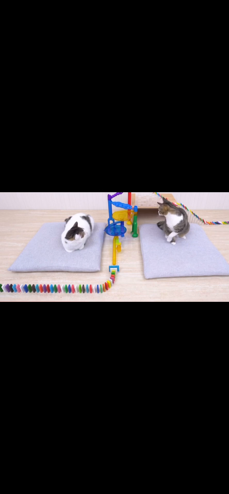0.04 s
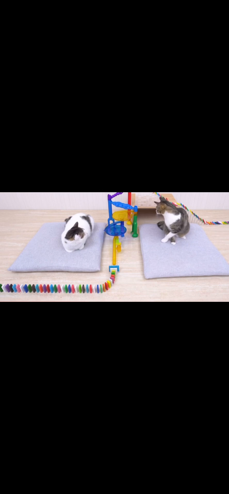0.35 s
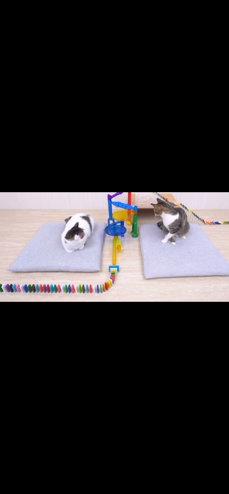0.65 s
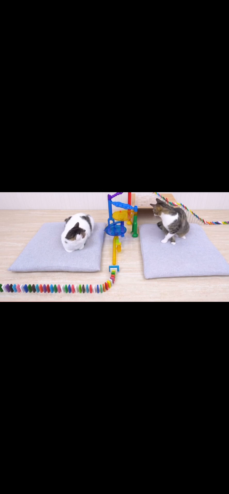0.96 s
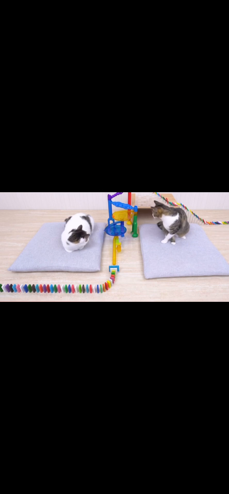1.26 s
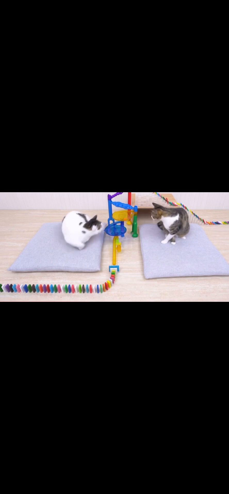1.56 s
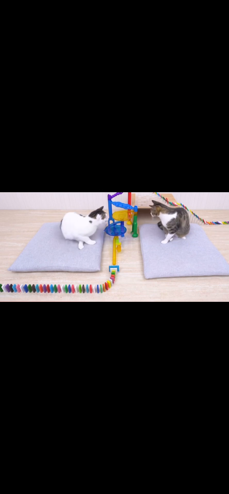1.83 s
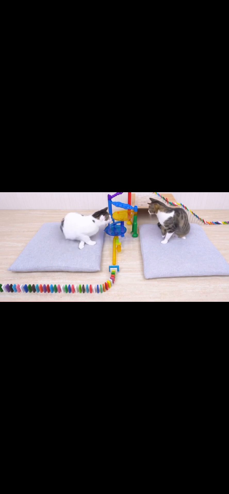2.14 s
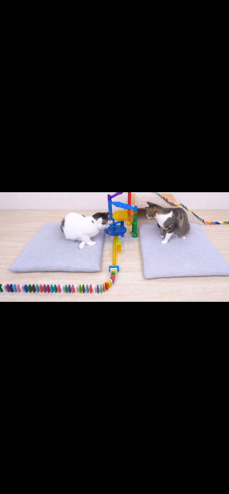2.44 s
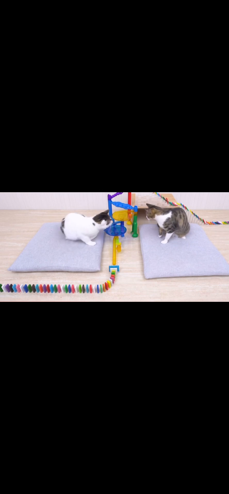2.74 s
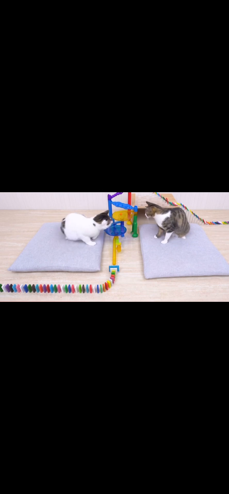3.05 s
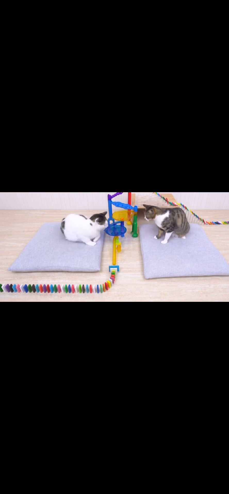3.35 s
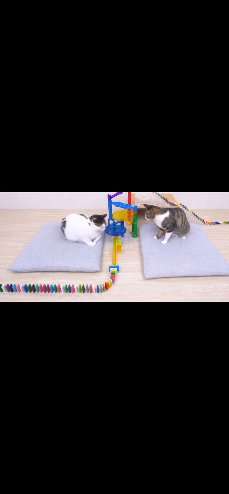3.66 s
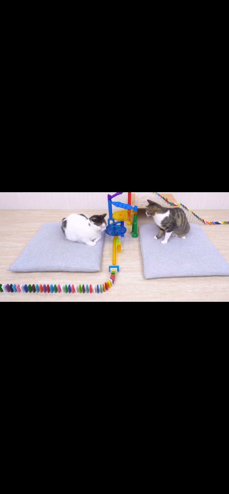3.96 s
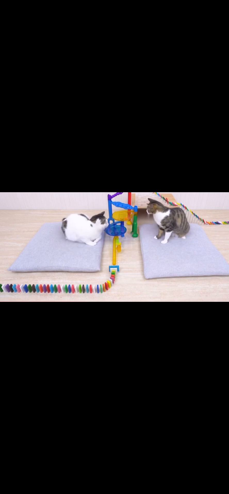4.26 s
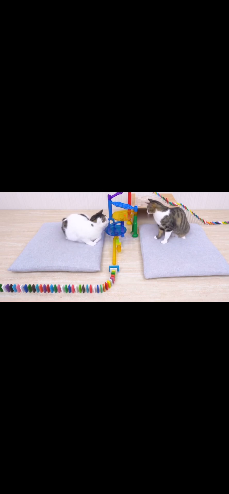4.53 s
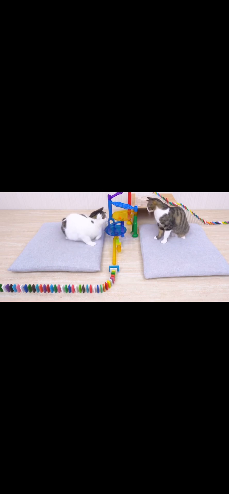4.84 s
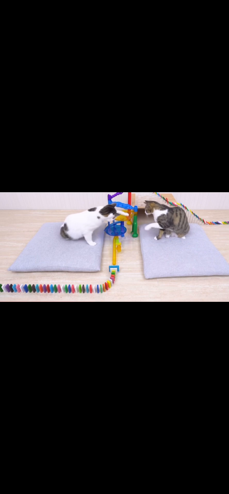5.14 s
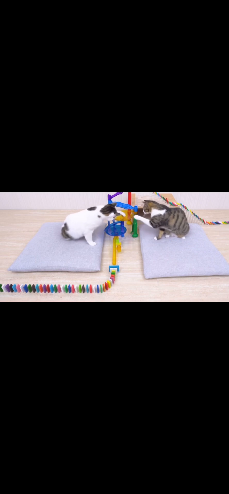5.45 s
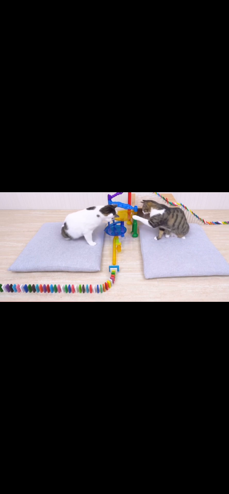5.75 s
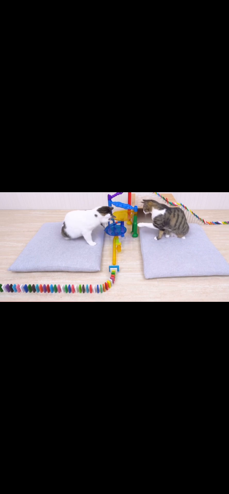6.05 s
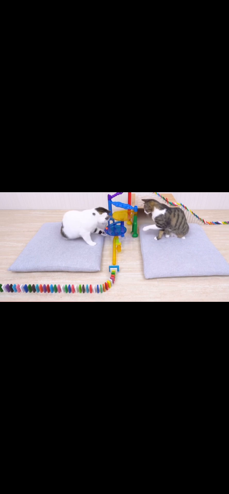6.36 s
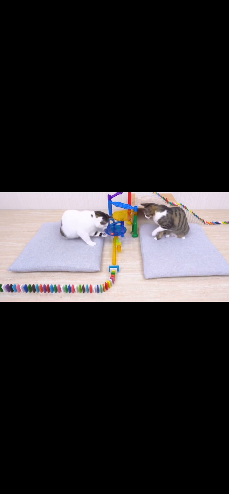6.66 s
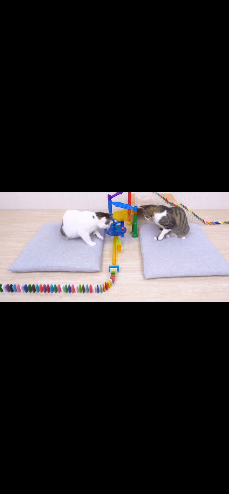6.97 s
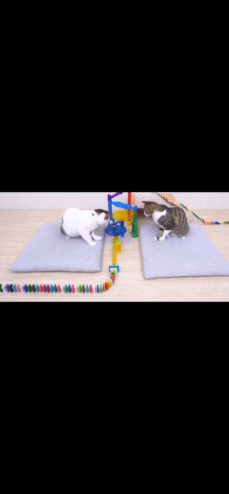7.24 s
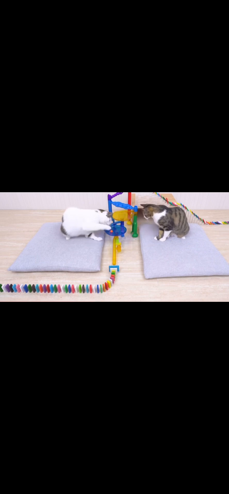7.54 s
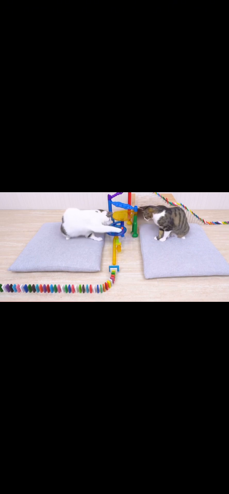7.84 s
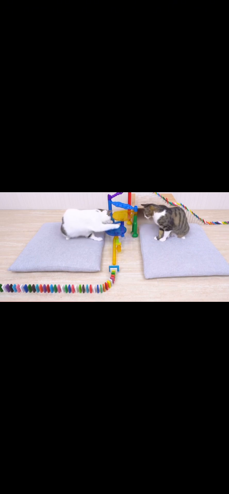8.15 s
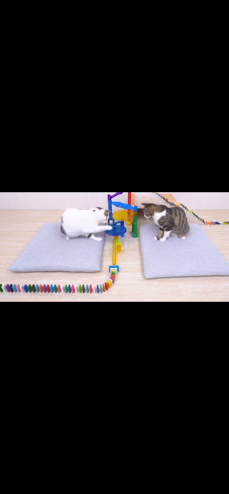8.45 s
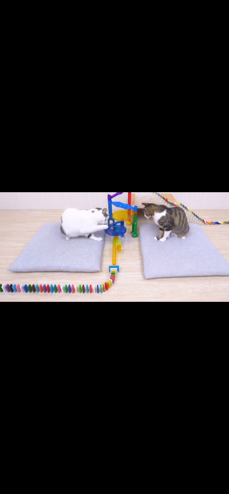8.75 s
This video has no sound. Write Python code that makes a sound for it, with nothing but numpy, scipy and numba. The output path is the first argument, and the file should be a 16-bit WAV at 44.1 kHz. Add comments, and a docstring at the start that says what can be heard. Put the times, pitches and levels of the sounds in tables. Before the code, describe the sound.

A marble clacks into a plastic toy run, rolls around the bends, clatters into a hollow piece and rolls on.

```python
"""Marble in a plastic toy run

A marble clacks and bounces into a plastic run in a small, hard-floored room. It knocks at the joints,
circles the bends about once a second, scrapes the walls and clatters into a hollow piece, then rolls on.
Rolling is a stream of tiny impacts; the marble's place in the lap decides which modes they ring.
Harder blows are brighter, and each spot that is struck favours its own modes."""
import sys
import numpy as np
from scipy import signal
from scipy.fft import rfft, irfft
from scipy.io import wavfile
from scipy.ndimage import uniform_filter1d, map_coordinates
from numba import njit

SR = 44100
rng = np.random.default_rng(int(sys.argv[2]) if len(sys.argv) > 2 else 0)


def output_pcm(signal):
    """Save a mono or channel-first signal as 16-bit PCM at the path in sys.argv[1].

    Samples are clipped to [-1, 1] before scaling.
    """
    pcm = np.clip(np.atleast_2d(signal).T, -1, 1) * 32767
    wavfile.write(sys.argv[1], SR, np.round(pcm).astype(np.int16))


N = 396900

# reverb tail of the room: (frequency [Hz], t60 [s], level [dB])
ROOM_TAIL = [(249.3, 0.85, 2.5), (890, 0.58, 1.5), (2000, 0.46, 0), (2670, 0.48, -3), (3210, 0.56, -0.5),
             (4100, 0.46, 1.5), (4900, 0.51, -4.5), (6095, 0.42, -7.5), (8000, 0.44, -3),
             (14960, .28, -6.5)]
# the frame of the run, singing along with the marble: (frequency [Hz], width [Hz], level [dB])
FRAME_RING = [(899, 15, 5.5), (1040, 4.8, -2), (1268, 18, 1.5), (1377, 14, -0.5), (1483, 10, -7),
              (1510, 12, -3.5), (1761, 37, -3), (2480, 10, -4), (2740, 7.4, -8)]
# colour of the background noise, low room rumble plus a faint high hiss: (frequency [Hz], gain [dB])
BACKGROUND_EQ = [(18, -35.5), (36, -4.5), (52, -3), (100, 1.5), (128, -2), (303, -4.5), (362, -2),
                 (443, 3.5), (543, -4.5), (756, 0.5), (1110, -19), (1790, -14), (3470, -29),
                 (4950, -22.5), (8440, -24), (9580, -22), (13000, -22.5)]
# body, thud, ring and tick bands of a blow: (low edge [Hz], high edge [Hz])
BLOW_BANDS = [(1150, 2300), (300, 1150), (2300, 5000), (5000, 16000)]
# colour of the contact crack: (frequency [Hz], gain [dB])
CRACK_EQ = [(200, -22.5), (450, -14), (720, -15), (950, -2), (2000, 1), (6000, -2.5), (15000, -8.5)]

# clacks on a small piece: (time [s], body level [dB], hardness [dB], spot pitch [Hz])
CLACK_HITS = [(-0.025, -32.5, -1.5, 2577), (0.0544, -47, 3.5, 2600), (0.1252, -34, -2.5, 2610),
              (0.148, -37, -5, 2600), (0.1754, -42.5, -4.5, 2016)]
# modes of the small piece: (frequency [Hz], width [Hz], level [dB])
SMALL_PIECE_MODES = [(900, 10, -8), (1130, 23, -12), (1430, 21, -11.5), (2034, 40, -4.5), (2620, 170, 3),
                     (3450, 60, -15.5), (4260, 130, -9), (5530, 240, -3), (5730, 150, -16.5),
                     (6670, 340, -7.5), (7970, 400, -12)]
# bright bounces on a hard part: (time [s], body level [dB], hardness [dB], spot pitch [Hz])
BOUNCE_HITS = [(0.2931, -32.5, 2, 3370), (0.298, -32.5, -12.5, 3430), (0.3112, -34.5, 8.5, 6900),
               (0.33, -34.5, -13, 4200), (0.3399, -37, -10, 3200), (0.3468, -33.5, 7, 5970),
               (0.3664, -36.5, -13.5, 1750), (0.3859, -34.5, 4, 6130), (0.401, -39.5, -12, 4200),
               (0.4363, -38.5, 1.5, 5800), (0.4773, -41.5, -2, 5800), (0.5023, -43, -0.5, 5800),
               (0.5269, -46.5, -4.5, 2750), (0.5463, -46.5, -5.5, 2750), (0.562, -47.5, -8.5, 2750)]
# modes of the hard part: (frequency [Hz], width [Hz], level [dB])
HARD_PART_MODES = [(1101, 43, -10), (1682, 78, 4), (2760, 190, 1), (3180, 98, -11), (3413, 41, -5),
                   (4290, 370, -5.5), (5780, 170, 0.5), (6760, 170, -1.5), (7670, 150, -9), (9570, 500, -8),
                   (11100, 1100, 4), (14300, 1300, -3)]
# knocks on walls and joints: (time [s], body level [dB], hardness [dB], spot pitch [Hz])
KNOCK_HITS = [(0.7459, -54.5, -3.5, 2800), (0.7955, -53, -7, 1250), (0.8366, -47.5, -7, 1260),
              (0.8587, -38.5, -1.5, 1780), (0.9512, -43.5, 2.5, 970), (0.9752, -40.5, -8, 1400),
              (1.064, -44, 7, 1330), (1.6602, -39, 2, 1780), (1.77, -30, 8.5, 1470),
              (1.7832, -34.5, -2, 910), (1.8819, -44, 8, 920), (1.9281, -42.5, 4, 1780),
              (1.991, -40.5, -7, 900), (2.1001, -42, -4, 940), (2.1957, -44.5, -1.5, 1250),
              (2.5279, -42, -1, 1440), (2.7988, -29.5, -4.5, 1460), (2.8227, -31.5, 6, 894),
              (3.0366, -38.5, 6.5, 1390), (3.1691, -42.5, -3, 940), (3.4238, -46, -2, 1500),
              (3.5229, -37.5, 1.5, 1830), (3.6063, -41.5, 4, 2710), (3.618, -41.5, 3.5, 2710),
              (3.9477, -39, 1, 2070), (4.599, -43, 3, 1640), (4.8988, -48, -6.5, 1400),
              (5.0853, -45.5, -10.5, 1520), (6.1526, -44.5, -4.5, 1434), (6.4979, -43.5, -3, 1310),
              (6.6602, -46, -7, 1520), (6.9174, -40.5, 4.5, 1630), (6.9405, -42, -5.5, 1700),
              (6.9477, -38.5, 6, 1760), (6.9595, -41, -1, 1700), (7.0264, -39, 2, 1410),
              (7.0772, -25.5, 8.5, 1450), (7.0925, -37, -4.5, 1400), (7.101, -36, 6, 1410),
              (7.2437, -33.5, -1, 1800), (7.3742, -38, -2, 1520), (7.5437, -43, -11.5, 1870),
              (7.7122, -42.5, -4, 1500), (7.7885, -41, -5.5, 1500), (7.8235, -43, -8, 1550),
              (7.837, -45, -4, 1830), (7.8905, -43, -3.5, 1610), (8.0067, -28, 4, 1690),
              (8.0254, -32.5, -2.5, 1670), (8.0608, -19, 5.5, 1710), (8.5072, -35.5, -11, 1810),
              (8.5124, -34.5, 5, 1420), (8.7537, -34, 4, 1835), (8.8405, -45, -2, 1700),
              (8.8643, -47, -1, 1750), (8.878, -37.5, -3, 1750), (8.9469, -46, 12, 1820),
              (8.9824, -41.5, 6, 1400)]
# walls and joints above the drop: (frequency [Hz], width [Hz], level [dB])
UPPER_WALL_MODES = [(926, 7.8, -14.5), (1048, 25, -18.5), (1250, 150, 2), (1510, 18, 7), (1710, 110, 10),
                    (2190, 260, 4), (2715, 100, 6.5), (3270, 220, 9.5), (4030, 115, 0), (5560, 100, -10),
                    (6400, 150, -3), (7360, 190, -14), (10400, 200, -31)]
# walls and joints below the drop: (frequency [Hz], width [Hz], level [dB])
LOWER_WALL_MODES = [(598, 63, -5), (830, 82, -1.5), (1042, 23, 1.5), (1183, 140, 4.5), (1416, 6.6, 4),
                    (1566, 17, 3.5), (1675, 130, 4.5), (1782, 63, 6.5), (2130, 24, -4), (2630, 60, -9),
                    (3010, 70, -5.5), (3417, 110, -6.5), (3920, 120, -9.5), (4280, 140, -6),
                    (6150, 400, -19), (13200, 400, -4)]

# slow course of the roll, a list per stretch: (time [s], body fader [dB], grit fader [dB], resonance [Hz])
ROLL_STRETCHES = [
    [(0.8, -62, -65, 1330), (0.97, -43, -48.5, 1350), (1.3, -47.5, -62.5, 1420), (1.85, -44, -56, 1336),
     (2.15, -53.5, -55.5, 1180), (2.32, -55, -64, 1470), (2.52, -42.5, -57, 1560), (2.66, -43.5, -57, 1370),
     (3.0, -53, -64, 1580), (3.2, -49.5, -57.5, 1500), (3.31, -47, -59.5, 1590), (3.42, -45, -61, 1520),
     (3.56, -44, -50.5, 1530), (3.9, -52.5, -63.5, 1543), (4.12, -48.5, -56, 1460), (4.4, -46, -61, 1616),
     (4.8, -52, -61.5, 1420), (5.12, -47, -76, 1600), (5.2, -52, -61.5, 1475), (5.27, -67, -82, 1533),
     (5.36, -70.5, -75, 1567)],
    [(6.05, -58, -75, 1380), (6.25, -49, -63.5, 1470), (6.58, -49, -62.5, 1440), (6.73, -54, -62.5, 1550),
     (6.96, -41.5, -48, 1480), (7.22, -47.5, -59.5, 1490), (7.48, -56.5, -68, 1580),
     (7.72, -50.5, -60.5, 1460), (7.84, -43.5, -60, 1464), (8.27, -52, -59, 1390), (8.36, -76, -73.5, 1365)],
    [(8.77, -50, -58, 1470), (8.92, -45.5, -53, 1294), (9.0, -36.5, -46, 1380)],
]
# the marble passes the stiffest spot of its lap: (time [s])
LAP_TIMES = [.72, 1.65, 2.64, 3.56, 4.4, 5.22, 6.05, 6.92, 7.87, 8.87, 9.85]
# what each lap adds to the slow course: (position [laps], body [dB], grit [dB], resonance [Hz])
LAP_SWING = [(0, -0.5, 3, 204), (0.201, -0.7, -1, -19), (.48, 1.9, 2, -4), (.7, 0.7, 2.5, -110),
             (.86, -0.4, 1.5, -29)]
# colour of the track under the rolling marble: (frequency [Hz], gain [dB])
RUMBLE_EQ = [(150, -46.5), (420, -9), (740, -3), (1000, -1), (1500, -14.5), (2200, -21), (3800, -5),
             (4800, -44), (6000, -22), (8000, -34), (13000, -45.5)]
# modes of the track: (frequency [Hz], width [Hz], level [dB], track resonance that drives it best [Hz])
TRACK_MODES = [(446.6, 16, -8, 1570), (919.6, 8.9, 18.5, 1226), (1011, 160, 2.5, 1382),
               (1192, 140, -5, 1464), (1368, 86, -0.5, 1470), (1580, 150, 5, 1670), (1772, 270, 7, 1750),
               (2062, 300, 5.5, 1204), (2300, 130, -13, 1630), (2740, 25, -7.5, 1710), (3425, 76, 0, 1344),
               (4170, 74, -7.5, 1650), (5350, 45, -14.5, 1600)]
# the plastic bowl that the hops tap: (frequency [Hz], width [Hz], level [dB])
BOWL_MODES = [(1035, 43, 3), (1250, 79, -5.5), (1410, 51, -3.5), (1479, 25, -2), (1657, 37, -3.5),
              (1772, 43, 4.5), (1885, 40, 11), (2000, 55, -13)]
# high track resonances that the grit rattles in: (frequency [Hz], width [Hz], level [dB])
GRIT_RING = [(2154, 68, -1.5), (2407, 79, -1), (2728, 120, 2), (3170, 54, 1.5), (3495, 75, -1.5),
             (4105, 120, 0.5), (5320, 160, -1), (6880, 200, -1.5)]

# short scrapes along the wall: (time [s], length [s], level [dB], spot pitch [Hz])
WALL_SCRAPES = [(2.368, 0.027, -65.5, 3280), (2.47, 0.031, -73, 3370), (2.523, 0.15, -60, 3900),
                (3.158, 0.053, -62.5, 2650), (3.387, 0.13, -62.5, 3970), (3.513, 0.1, -53.5, 2710),
                (4.369, 0.18, -61, 2720), (4.91, 0.085, -71.5, 3700), (5.016, 0.06, -65.5, 2750),
                (5.023, 0.064, -71, 4100), (6.298, 0.048, -71, 3560), (6.459, .13, -67, 4070),
                (6.898, .075, -57.5, 3000), (7.741, 0.022, -66, 3640)]
# modes that a scrape rings: (frequency [Hz], width [Hz], level [dB])
SCRAPE_RING = [(2210, 74, 12.5), (2736, 61, 6.5), (2970, 70, 4), (3080, 55, -1.5), (3530, 220, 0),
               (4100, 200, -1.5), (5350, 200, -3.5)]
# the drop and its bounces: (time [s], body level [dB], hardness [dB], spot pitch [Hz])
DROP_HITS = [(5.5915, -41.5, -19.5, 870), (5.6309, -36, -5.5, 2680), (5.6423, -26.5, 4, 1940),
             (5.652, -34.5, 10, 2200), (5.66, -29.5, 7.5, 2140), (5.6725, -39, -2.5, 4100),
             (5.678, -22.5, 1.5, 870), (5.7302, -39.5, -5, 1700), (5.7679, -25.5, -2.5, 900),
             (5.8367, -26.5, 1.5, 865), (5.8929, -33, 9, 1420), (5.8986, -28.5, -1, 1420),
             (5.9412, -37, -9.5, 1420), (5.956, -36.5, -3, 1700), (5.9755, -39, -7.5, 1700)]
# modes of the hollow piece it lands in: (frequency [Hz], width [Hz], level [dB])
HOLLOW_PIECE_MODES = [(250, 120, -21.5), (500, 160, -12.5), (865, 55, -1), (1405, 40, 4), (1700, 88, 7.5),
                      (2180, 110, -7), (2695, 100, -11), (3377, 86, -7.5), (3680, 110, -4.5),
                      (4150, 170, -2.5), (4970, 180, -7), (5700, 440, -3), (7200, 277, -15.5),
                      (9080, 130, -19)]


def undb(db):
    """Decibels to gain."""
    return 10 ** (np.asarray(db) / 20)


def unit(x):
    """Scale to rms 1."""
    return x / np.sqrt(np.mean(x ** 2) + 1e-20)


def band(x, lo_hz, hi_hz, order=3):
    """Causal band-pass."""
    sos = signal.butter(order, [lo_hz, min(hi_hz, .47 * SR)], "band", fs=SR, output="sos")
    return signal.sosfilt(sos, x + 1e-18)


def equalise(x, curve):
    """Minimum-phase EQ, built from the cepstrum of the curve's log gain."""
    hz, db = np.transpose(curve)
    bins_hz = np.maximum(np.fft.rfftfreq(4096, 1 / SR), 1)
    cepstrum = irfft(np.log(undb(np.interp(np.log(bins_hz), np.log(hz), db))))
    half = len(cepstrum) // 2
    cepstrum[1:half] *= 2
    cepstrum[half + 1:] = 0
    return signal.fftconvolve(x, irfft(np.exp(rfft(cepstrum))))[:len(x)]


def room_response(wet_db=-3, build_s=.0033, frame_db=-2, echo_s=.0135, echo_db=-17):
    """Direct sound, a slap off the near wall, the ringing frame and a tail whose treble dies first."""
    t = np.arange(SR * 3 // 4) / SR
    hz, t60, db = np.transpose(ROOM_TAIL)
    edges = np.geomspace(150, 18000, 25)
    tail = 0
    for lo, hi in zip(edges, edges[1:]):
        log_centre = np.log(lo * hi) / 2
        decay = np.exp(-np.log(1000) * t / np.interp(log_centre, np.log(hz), t60))
        gain = np.sqrt(2 * (hi - lo) / SR) * undb(np.interp(log_centre, np.log(hz), db))
        noise = band(rng.standard_normal(len(t)), lo, hi) * decay
        tail = tail + gain * noise / np.linalg.norm(noise)
    response = tail * (1 - np.exp(-(t / build_s) ** 2)) * undb(wet_db)
    for mode_hz, width_hz, mode_db in FRAME_RING:
        gain = undb(frame_db + mode_db) * 2 * np.pi * width_hz / SR
        response += gain * np.exp(-np.pi * width_hz * t) * np.cos(2 * np.pi * mode_hz * t)
    response[0] += 1
    response[int(echo_s * SR)] += undb(echo_db)
    return response


def background(level_db=-67):
    """A steady noise bed: low room rumble plus a faint high hiss."""
    noise = equalise(rng.standard_normal(N), BACKGROUND_EQ)
    return unit(band(noise, 25, 12000, order=8)) * undb(level_db)


def off_pitch(hz, best_hz, reach):
    """0 on the favoured pitch, nearing 1 once the log frequency ratio is beyond the reach."""
    return 1 - np.exp(-(np.log(hz / best_hz) / reach) ** 2)


def ring(modes, spot_hz, reach, off_spot_db, damping_hz, scatter_db):
    """Free ring of a plastic part; modes far from the pitch of the struck spot are weaker."""
    t = np.arange(SR // 16) / SR
    hz, width, db = np.transpose(modes)[:, :, None]
    width = width + damping_hz
    db = db + off_spot_db * off_pitch(hz, spot_hz, reach)
    weight = undb(db + scatter_db * rng.standard_normal(hz.shape)) * np.sqrt(width)
    phase = 2 * np.pi * rng.random(hz.shape)
    tone = np.sum(weight * np.exp(-np.pi * width * t) * np.sin(2 * np.pi * hz * t + phase), axis=0)
    return tone / np.linalg.norm(tone)


def contact_crack(count, smear_s, grain_hz=110):
    """A click dispersed by a plastic wall: every frequency leaves at its own moment."""
    hz = np.fft.rfftfreq(2 * count, 1 / SR)
    knots = rng.exponential(size=256)
    delay_s = smear_s * np.interp(hz / grain_hz, np.arange(len(knots)), knots)
    click = irfft(np.exp(-2j * np.pi * np.cumsum(delay_s) * hz[1]))
    return equalise(click[:count], CRACK_EQ)


def voice_blows(hits, thud_db, ring_db, tick_db, thud_loss, thud_cut_db_per_s=0, thud_cut_db_per_oct=0):
    """Balance the bands against the body: harder blows have less thud and more ring and tick."""
    blows = []
    for s, body_db, hardness_db, spot_hz in hits:
        # the thud may also thin along the run and on high-pitched spots
        thinning_db = thud_cut_db_per_s * s + thud_cut_db_per_oct * np.log2(spot_hz / 1500)
        balance_db = np.array([0, thud_db - thud_loss * hardness_db - thinning_db,
                               ring_db + .3 * hardness_db, tick_db + hardness_db])
        blows.append((s, spot_hz, body_db + balance_db))
    return blows


def strikes(blows, modes, room, damping_hz, crack_db, rise_s, room_db, off_spot_db, crack_s=.0025):
    """Each blow cracks at the contact and rings the part; its band levels are set over the attack."""
    lead, attack = SR // 4, int(.008 * SR)
    filters = [signal.butter(3, edges, "band", fs=SR, output="sos") for edges in BLOW_BANDS]
    out = np.zeros(N + 2 * SR)
    for s, spot_hz, levels_db in blows:
        tone = ring(modes, spot_hz, .077, off_spot_db, damping_hz, scatter_db=3)
        t = np.arange(len(tone)) / SR
        # quieter blows, going by their tick, are given a slower attack and a duller top
        accent_db = levels_db[-1] + 40
        stretch = undb(-.36 * min(accent_db, 0))
        top_hz = np.clip(13000 * undb(.65 * accent_db), 3000, .45 * SR)
        crack = contact_crack(len(t), crack_s * stretch)
        build_up = 1 - np.exp(-t / (rise_s * stretch))
        blow = tone * build_up + undb(crack_db) * crack / np.linalg.norm(crack)
        blow = signal.sosfilt(signal.butter(2, top_hz, fs=SR, output="sos"), blow)
        start = lead + int(s * SR)
        for sos, db in zip(filters, levels_db):
            part = signal.sosfilt(sos, blow)
            out[start:start + len(part)] += part * undb(db) / np.std(part[:attack])
    reverb = signal.fftconvolve(out, room)[:len(out)] - out
    return (out + undb(room_db) * reverb)[lead:lead + N]


def clacks(room):
    """The marble clacks on a small piece with one clear pitch."""
    blows = voice_blows(CLACK_HITS, thud_db=-11.5, ring_db=5, tick_db=1.5, thud_loss=.079)
    return strikes(blows, SMALL_PIECE_MODES, room, damping_hz=45.4, crack_db=-9, rise_s=.0015,
                   room_db=1.5, off_spot_db=-.5)


def bounces(room):
    """Quick, bright bounces on a hard part whose ring dies fast."""
    blows = voice_blows(BOUNCE_HITS, thud_db=-12, ring_db=8, tick_db=1.5, thud_loss=.081)
    return strikes(blows, HARD_PART_MODES, room, damping_hz=108.2, crack_db=-12, rise_s=.0017,
                   room_db=0, off_spot_db=-5)


def with_slap_echo(hits, delay_s, weaker_db, duller_db):
    """A weaker, duller echo off a nearby wall follows each blow."""
    echoes = [(s + delay_s, db + weaker_db, hardness + duller_db, hz) for s, db, hardness, hz in hits]
    return list(hits) + echoes


def knocks(room):
    """The marble knocks on walls and joints, which ring with different modes above and below the drop."""
    hits = with_slap_echo(KNOCK_HITS, delay_s=.015, weaker_db=-14, duller_db=-7)
    blows = voice_blows(hits, thud_db=-4, ring_db=-7, tick_db=-19.5, thud_loss=.25,
                        thud_cut_db_per_s=1.04, thud_cut_db_per_oct=6.5)
    drop_s = DROP_HITS[0][0]
    upper = strikes([blow for blow in blows if blow[0] < drop_s], UPPER_WALL_MODES, room,
                    damping_hz=43.5, crack_db=-14.5, rise_s=.0013, room_db=1.5, off_spot_db=-7,
                    crack_s=.0026)
    lower = strikes([blow for blow in blows if blow[0] >= drop_s], LOWER_WALL_MODES, room,
                    damping_hz=35, crack_db=-13.5, rise_s=.00033, room_db=-.5, off_spot_db=-7,
                    crack_s=.0029)
    return upper + lower


def wander(rate_hz):
    """Smooth random modulation with rms 1."""
    knots = rng.standard_normal(2048)
    return unit(np.interp(np.arange(N) / SR * rate_hz, np.arange(len(knots)), knots))


def roll_automation():
    """The roll's gate, then its body, grit and resonance curves: slow course plus the swing of the lap."""
    t = np.arange(N) / SR
    times, *courses = np.vstack(ROLL_STRETCHES).T
    position, *swings = np.transpose(LAP_SWING)
    laps = np.interp(t, LAP_TIMES, np.arange(len(LAP_TIMES)))
    moving = sum((t >= rows[0][0]) & (t <= rows[-1][0]) for rows in ROLL_STRETCHES)
    gate = uniform_filter1d(moving.astype(float), size=600)
    return [gate] + [np.interp(t, times, course) + np.interp(laps, position, swing, period=1)
                     for course, swing in zip(courses, swings)]


def track_rumble(centre_hz, impacts_per_s=1500, grain_db=2.2, rattle_db=4, modes_db=12, wall_db=-7):
    """Tiny impacts swell in bunches and ring the track, whose channel adds a moving, hollow colour."""
    sizes = undb(grain_db * np.minimum(rng.exponential(size=N), 3.5) + rattle_db * wander(rate_hz=80))
    impacts = (rng.random(N) < impacts_per_s / SR) * sizes * rng.choice([-1, 1], N)
    ringing = 0
    for hz, width_hz, db, best_hz in TRACK_MODES:
        # a mode is loud while the marble runs over its antinode, and fades away from it
        gain = undb(db - 14 * off_pitch(centre_hz, best_hz, reach=.11))
        drive = band(impacts * gain, hz / 2, hz * 2, order=1)
        ringing = ringing + signal.lfilter(*signal.iirpeak(hz, hz / width_hz, fs=SR), drive)
    rumble = unit(equalise(impacts, RUMBLE_EQ)) + undb(modes_db) * unit(ringing)
    # the channel wall returns the sound one period of its resonance later
    reflection = map_coordinates(rumble, [np.arange(N) - SR / centre_hz], order=1)
    return rumble + undb(wall_db) * reflection


def skips(gap_s, scatter_db):
    """The marble skips along: one tap after each short, uneven flight."""
    flight, strength = rng.standard_normal((8000, 2)).T
    at = (np.cumsum(gap_s * np.exp(.5 * flight)) * SR).astype(int)
    taps = np.zeros(N)
    taps[at[at < N]] = undb(scatter_db * np.minimum(strength[at < N], 1.5))
    return taps


@njit
def sweep(x, centre_hz, width_hz):
    """State-variable band-pass with a moving centre."""
    out, band_state, low_state = np.empty(len(x)), 0., 0.
    for i in range(len(x)):
        tuning, damping = np.tan(np.pi * centre_hz[i] / SR), width_hz / centre_hz[i]
        passed = (band_state + tuning * (x[i] - low_state)) / (1 + tuning * (tuning + damping))
        band_state = 2 * passed - band_state
        low_state += 2 * tuning * passed
        out[i] = damping * passed
    return out


def resonate(x, modes):
    """Play a signal through a bank of resonators."""
    return sum(undb(db) * signal.lfilter(*signal.iirpeak(hz, hz / width_hz, fs=SR), x)
               for hz, width_hz, db in modes)


def hops(room, centre_hz, width_hz=340., tap_db=-7, room_db=-3):
    """Little hops tap the track's moving resonance and ring the plastic bowl."""
    taps = skips(gap_s=.0055, scatter_db=4.5)
    taps = unit(sweep(sweep(taps, centre_hz, width_hz), centre_hz, width_hz))
    direct = unit(undb(tap_db) * taps + unit(resonate(taps, BOWL_MODES)))
    reverb = signal.fftconvolve(direct, room)[:N] - direct
    return direct + undb(room_db) * reverb


def level_out(x):
    """Ride out slow changes of level and keep the fast rattle."""
    return x / np.sqrt(np.abs(uniform_filter1d(x ** 2, size=4000)) + 1e-20)


def rolling(room, waver=.02, hop_db=13, hiss_db=-9, body_trim_db=-2, grit_trim_db=-3):
    """A body of rumble and hops with grit on top; the resonance swings as the marble rounds the bends."""
    gate, body_db, grit_db, centre_hz = roll_automation()
    centre_hz = centre_hz * (1 + waver * wander(rate_hz=15))
    rumble = signal.fftconvolve(track_rumble(centre_hz), room)[:N]
    body = level_out(band(rumble + undb(hop_db) * hops(room, centre_hz), 140, 1900, order=4))
    treble = band(rumble, 1730, 15000, order=5)
    grit = level_out(undb(hiss_db) * treble + resonate(treble, GRIT_RING))
    return gate * (body * undb(body_db + body_trim_db) + grit * undb(grit_db + grit_trim_db))


def scrapes(room):
    """The marble chatters along a wall: a run of taps swells and fades, ringing that spot's high modes."""
    taps = skips(gap_s=.006, scatter_db=4)
    out = np.zeros(N + SR)
    for s, length_s, db, spot_hz in WALL_SCRAPES:
        start, span = int(s * SR), int(length_s * SR)
        chatter = taps[start:start + span] * np.hanning(span) ** .13
        tone = ring(SCRAPE_RING, spot_hz, reach=.048, off_spot_db=-14, damping_hz=5, scatter_db=1)
        scrape = signal.fftconvolve(chatter, tone)
        out[start:start + len(scrape)] += unit(scrape) * np.sqrt(len(scrape) / span) * undb(db)
    return signal.fftconvolve(out, room)[:N]


def drop(room):
    """The marble falls into a hollow piece and clatters, each blow with a short slap echo."""
    hits = with_slap_echo(DROP_HITS, delay_s=.014, weaker_db=-10, duller_db=-3.5)
    blows = voice_blows(hits, thud_db=-8, ring_db=2, tick_db=-7.5, thud_loss=.35, thud_cut_db_per_oct=6)
    return strikes(blows, HOLLOW_PIECE_MODES, room, damping_hz=61, crack_db=-17, rise_s=.0018,
                   room_db=-1.5, off_spot_db=-4)


def scene():
    """Mono mix of the impacts, the roll and the scrapes in one room, over the background noise."""
    room = room_response()
    impacts = clacks(room) + bounces(room) + drop(room) + knocks(room)
    return (impacts + rolling(room) + scrapes(room) + background())[None]


def record(dry, ceiling=.63, top_hz=15900):
    """Soft saturation rounds the loudest peaks, and a steep low-pass trims the top."""
    rounded = ceiling * np.tanh(dry / ceiling)
    return signal.sosfilt(signal.ellip(8, .2, 70, top_hz, fs=SR, output="sos"), rounded)


dry = scene()
out = record(dry)
output_pcm(out)
```